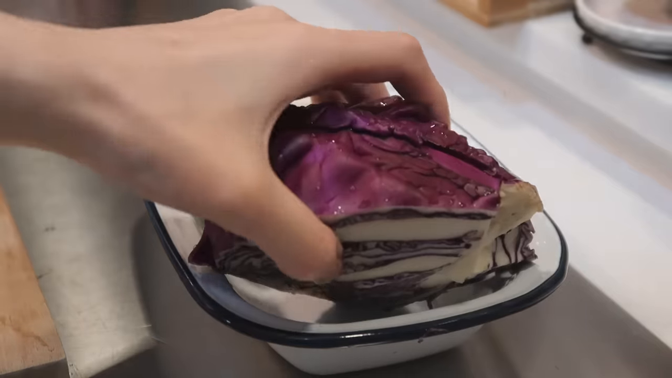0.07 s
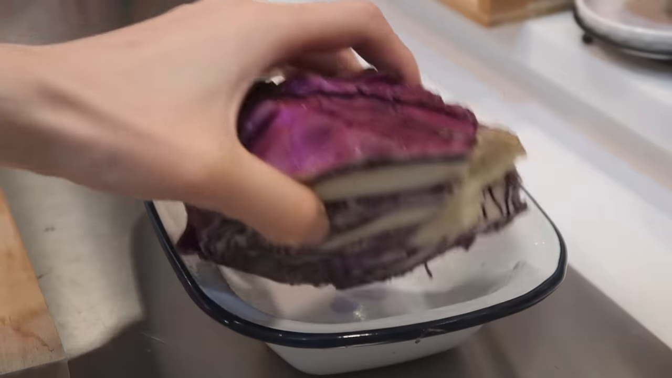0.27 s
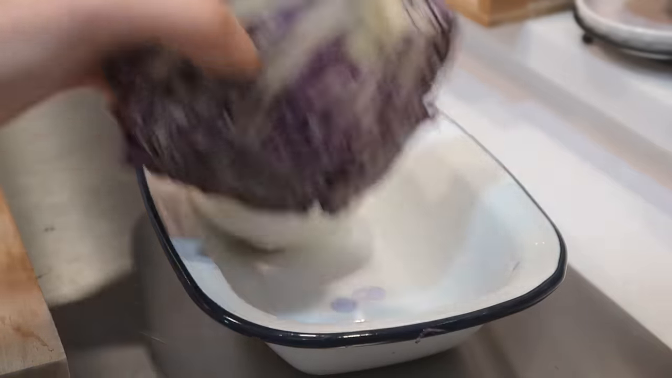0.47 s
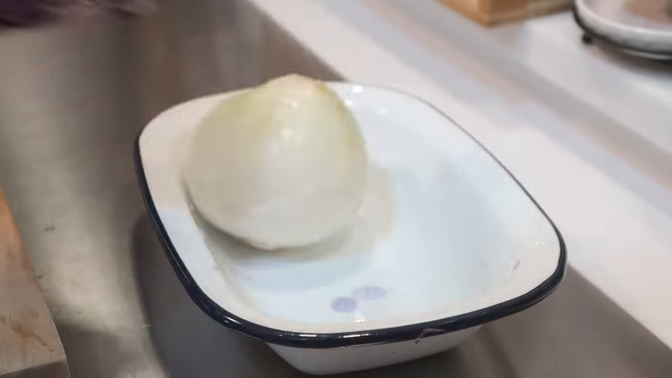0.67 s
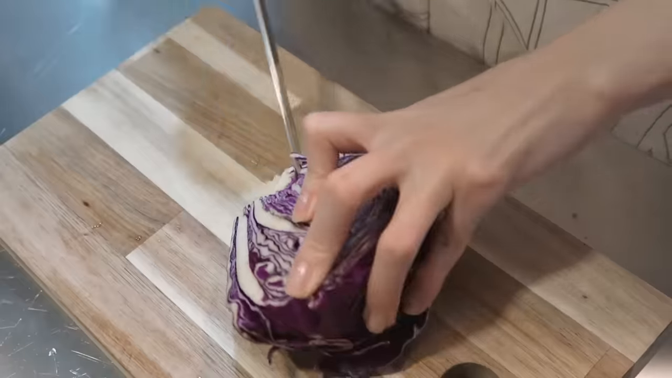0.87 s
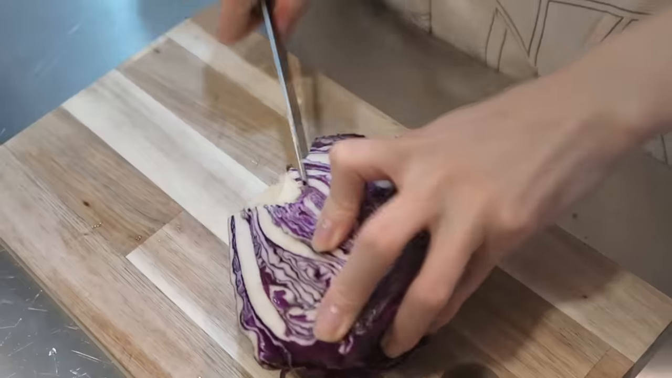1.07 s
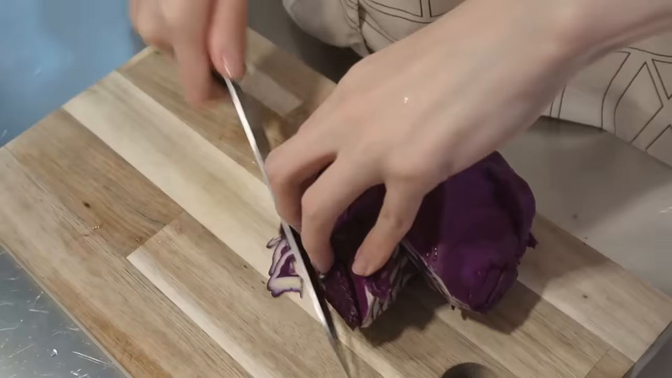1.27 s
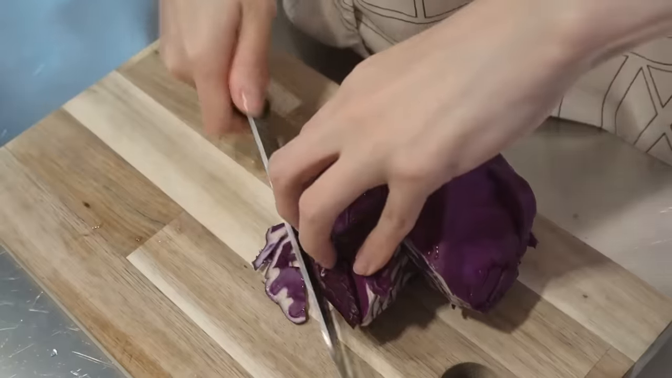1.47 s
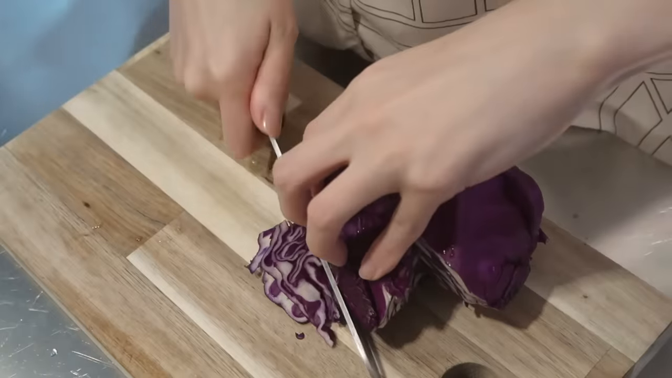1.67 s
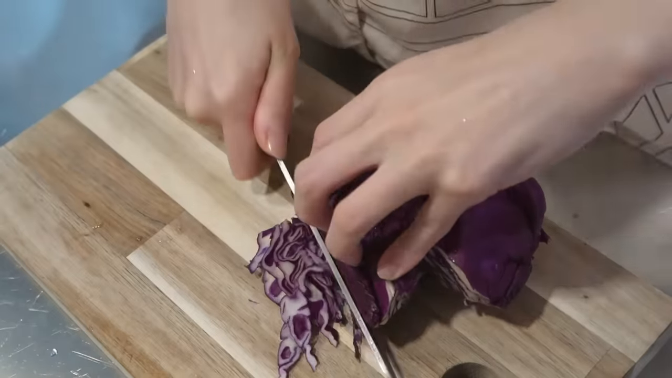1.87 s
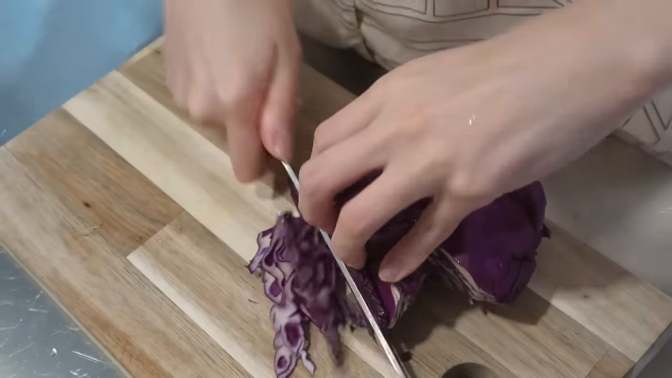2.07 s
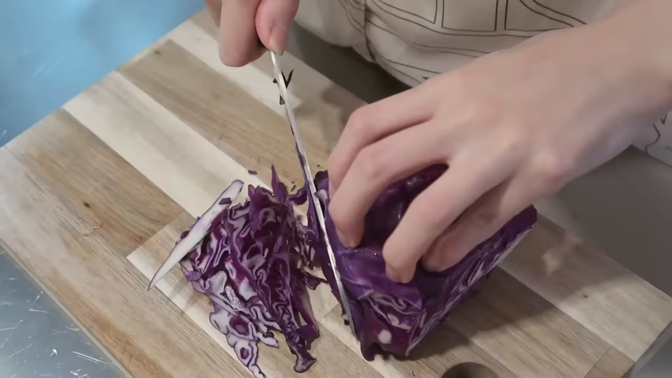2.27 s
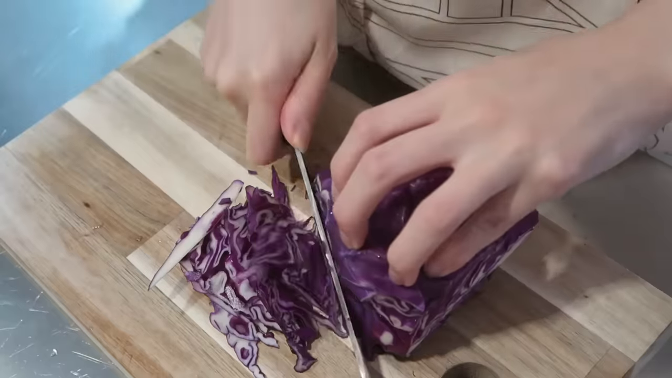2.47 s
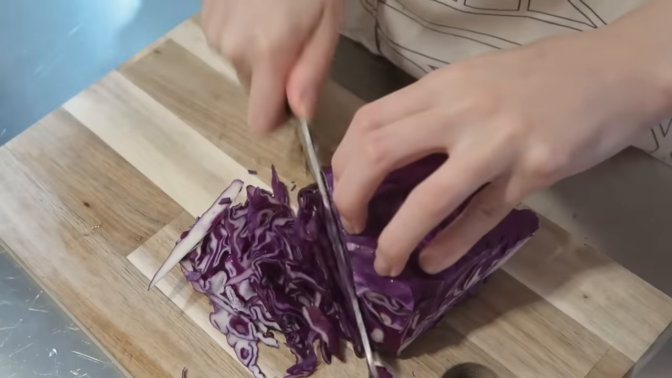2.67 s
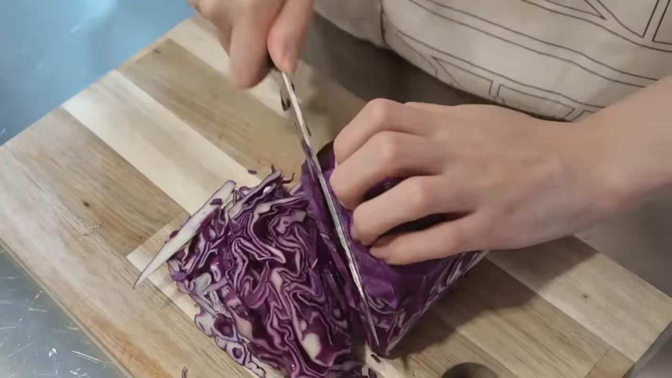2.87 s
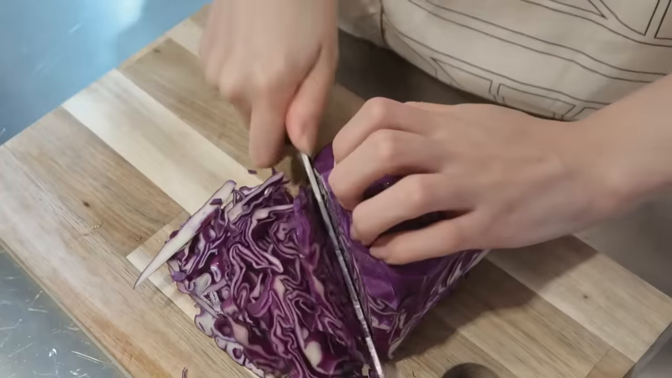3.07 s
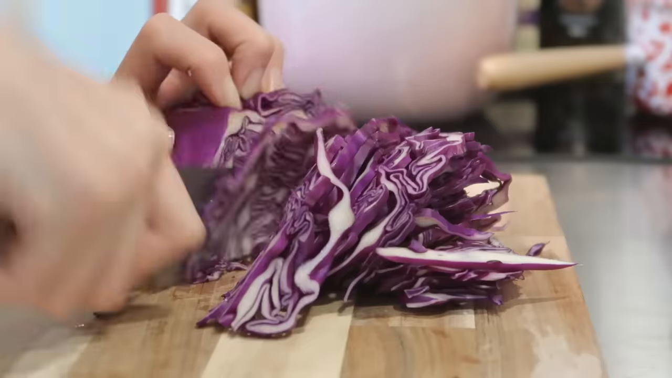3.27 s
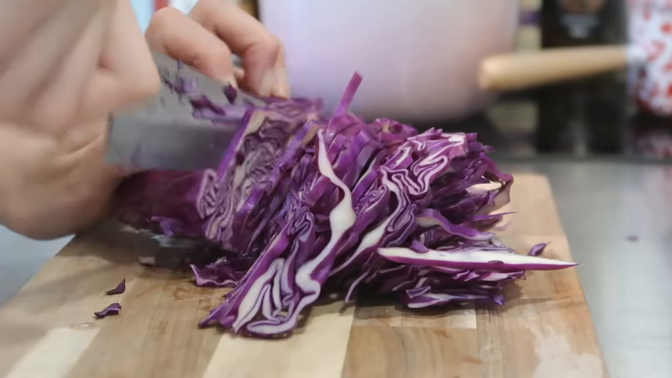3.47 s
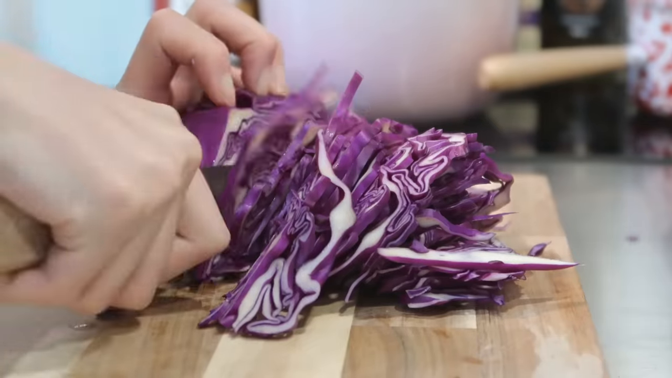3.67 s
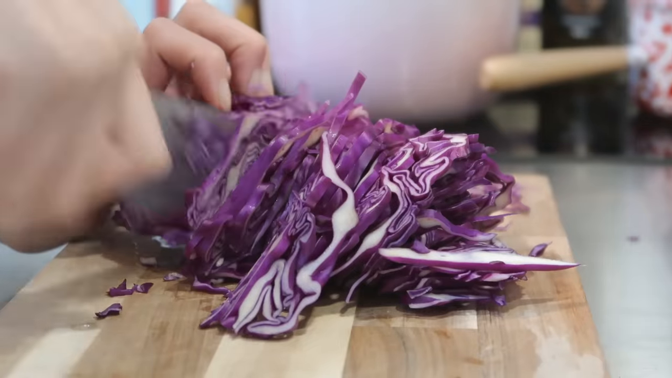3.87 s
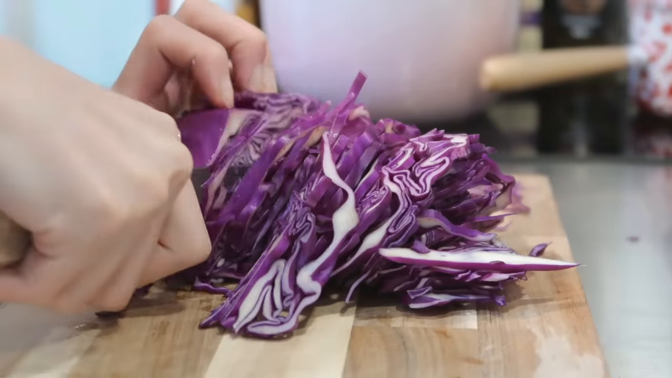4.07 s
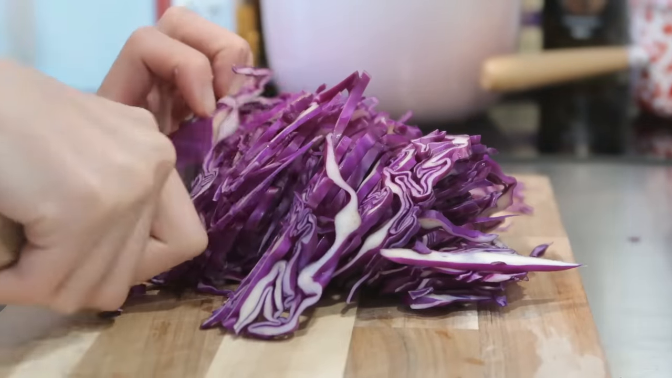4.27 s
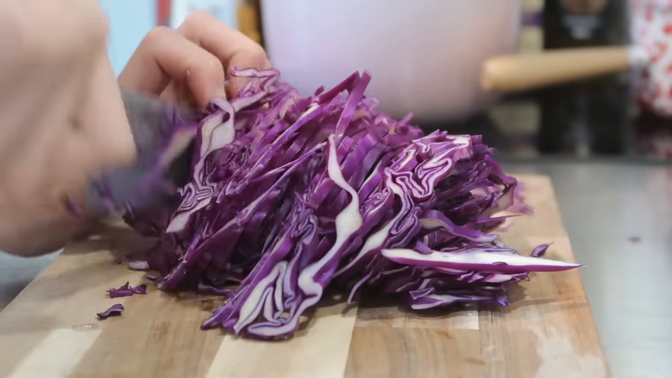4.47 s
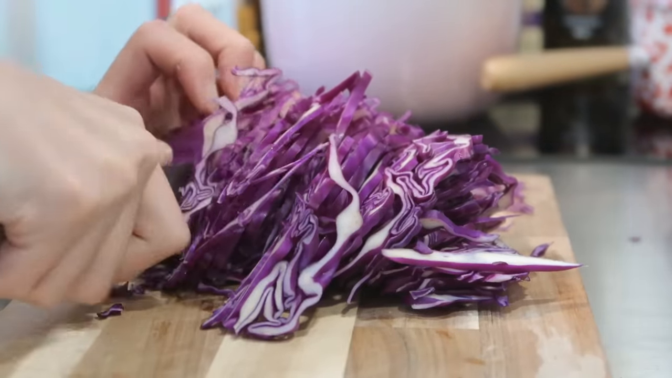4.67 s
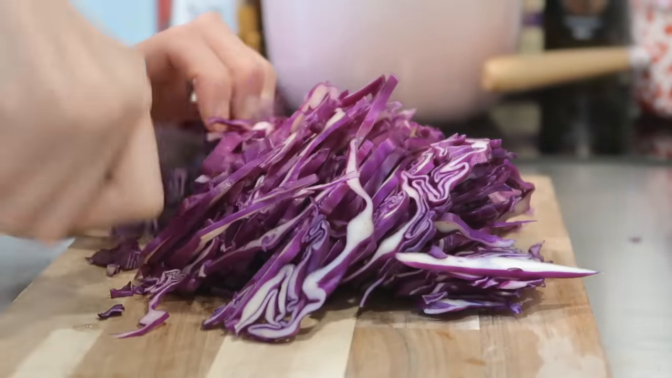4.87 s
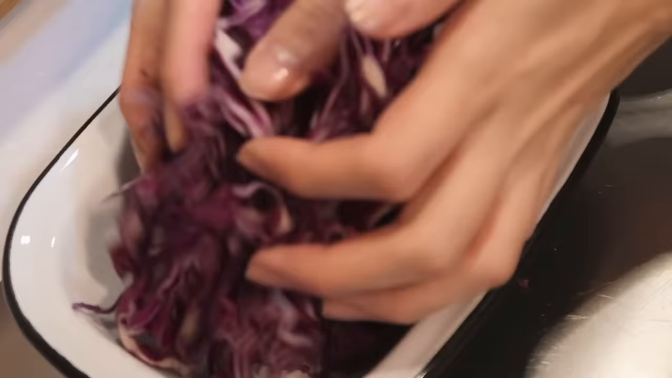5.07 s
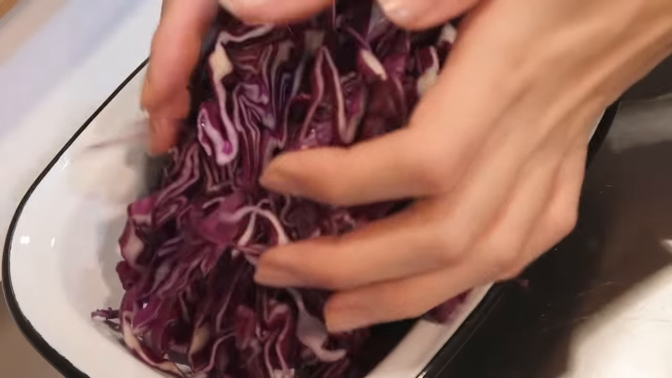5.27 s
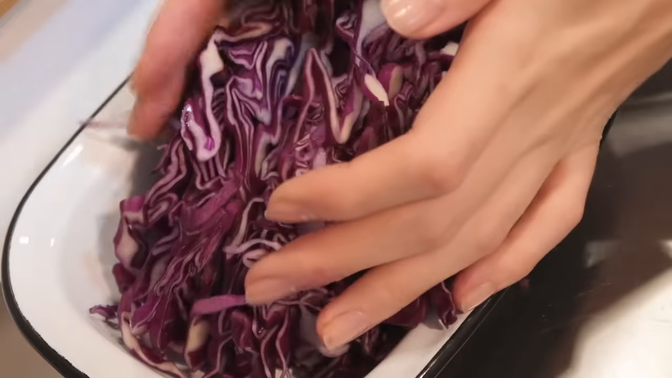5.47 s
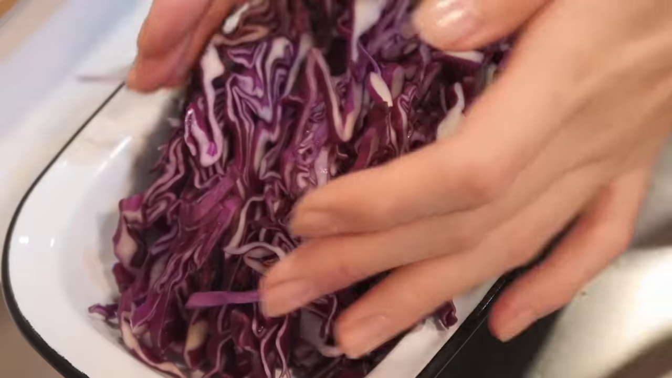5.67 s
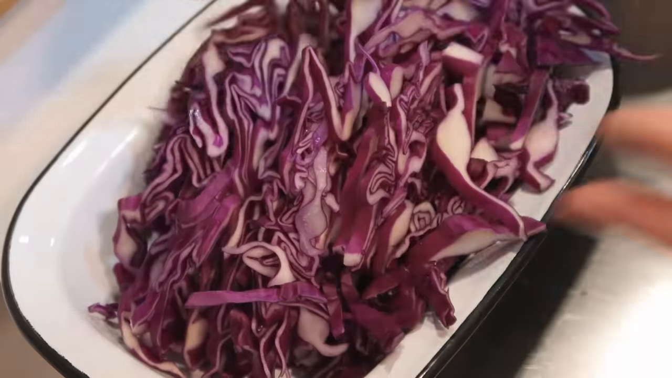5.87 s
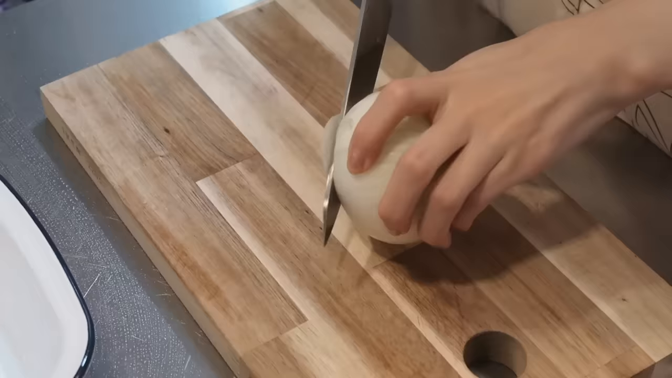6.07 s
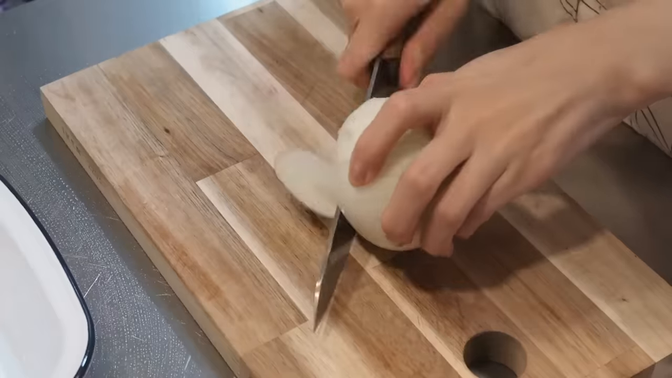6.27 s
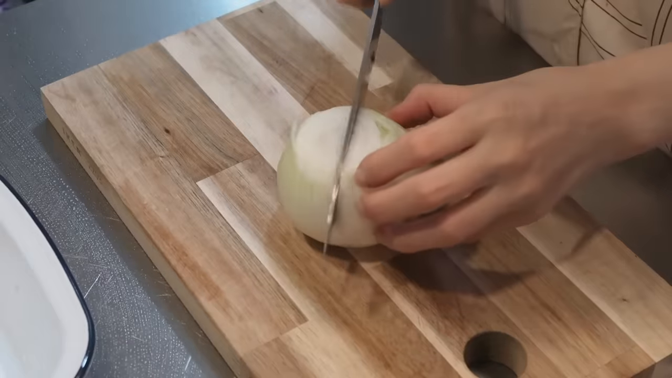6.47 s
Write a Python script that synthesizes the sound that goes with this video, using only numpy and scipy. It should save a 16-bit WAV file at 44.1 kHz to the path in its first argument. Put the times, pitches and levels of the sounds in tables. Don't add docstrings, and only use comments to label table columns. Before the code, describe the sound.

Close, dry recording in a small home kitchen. After nearly a second of steady low hum and a tiny tick, cabbage leaves rustle, ribs snap and a blade thuds loudly on wood. Regular shredding strokes follow, each a juicy rising crunch capped by a short woody crack. Around five seconds the chopping stops with small rustles; quiet hum remains until two crunchy cuts into a firm onion, abruptly ending.

```python
import sys
import numpy as np
from scipy import signal
from scipy.fft import rfft, irfft
from scipy.io import wavfile
from scipy.ndimage import uniform_filter1d

SR = 44100
rng = np.random.default_rng(int(sys.argv[2]) if len(sys.argv) > 2 else 0)


def wav_out(sig):
    wavfile.write(sys.argv[1], SR, np.round(np.clip(np.atleast_2d(sig).T, -1, 1) * 32767).astype(np.int16))


def gain_from_decibels(decibels):
    exponent = np.asarray(decibels, float) / 20
    return 10 ** exponent


N = 287866
T_S = np.arange(N) / SR
EDGE_FROM_S, ONION_FROM_S, SKIN_FROM_S, HEAD_UNTIL_S = 3.2, 6.0, 6.42, 1.092
FRAME_LEAD = 1024 - 123

# frequency in Hz, level in dB per Hz.
CRUNCH_SPECTRUM = [(180, -43), (300, -40.5), (994, -12.5), (1080, -8), (1580, -0.5), (2790, 0),
                   (3350, -4.5), (5700, -9), (10700, -15), (11900, -7), (15000, -26), (16000, -45)]
# frequency in Hz, level in dB per Hz.
ONION_SPECTRUM = [(410, -53), (700, -15.5), (1590, -11), (1750, -10.5), (2470, -10), (2690, -8),
                  (3110, -12), (3880, -3), (5390, -13), (7970, -20.5), (10200, -18.5), (12400, -12.5),
                  (13000, -33)]
# frequency in Hz, level in dB per Hz.
SKIN_SPECTRUM = [(400, -28), (709, -15), (1500, -4.5), (2740, -3), (4530, -0.5), (6500, -12), (9880, -19.5),
                 (13000, -20)]
# entry in seconds, exit in seconds, crunch on entry in dB,
# crunch at the end in dB, bright part in dB.
SLICES = [(1.023, 1.107, -56.5, -26.5, -15.5), (1.267, 1.365, -47.5, -36.5, -11.5),
          (1.642, 1.686, -54.5, -30, -4.5), (1.786, 1.87, -38.5, -32.5, -15),
          (2.026, 2.125, -42.5, -33, -15), (2.354, 2.467, -50.5, -34.5, -15.5),
          (2.62, 2.775, -50.5, -32.5, -13), (2.954, 3.053, -52.5, -28.5, -12),
          (3.229, 3.339, -59, -27.5, -9), (3.551, 3.65, -45.5, -31.5, -10),
          (3.905, 3.993, -46.5, -28, -12.5), (4.156, 4.266, -42, -31, -9), (4.523, 4.59, -68, -26, -8.5),
          (4.795, 4.941, -55, -37, -6), (6.197, 6.291, -42, -22, -3.5), (6.425, 6.529, -33, -36.5, -4)]
# extra brightness on entry in dB, extra dull part in dB, mid-depth swell in dB.
SLICE_TEXTURES = [(3, 1.5, -1.5), (-4, -0.5, 0), (1, 0.5, 1.5), (-2.5, 2.5, -4), (1.5, -2.5, -6),
                  (0, 12, 0.5), (0, 1.5, -2), (2, 9.5, -3), (3.5, 3, -1.5), (-1, 4.5, 3.5), (-2.5, -9, 2),
                  (0.5, -6, 2), (5.5, 0, -2), (-6, -2, 2), (5, 3, 2), (-4.5, 5, 0)]
SLICE_DULL_DB = (-9.5, -49, -29.5)
SLICE_EASE = (1.79, 2.13, 2.3)
# start in seconds, hold in seconds, crunch in dB,
# fall in dB per second, dull part in dB.
RUSTLES = [(0.809, 0.037, -44, 192, -2), (0.88, 0.021, -40.5, 507, 6), (1.095, 0.0083, -22, 1506, 4.5),
           (1.211, 0.0027, -56, 1207, 8), (1.545, 0.074, -41.5, 445, -21), (1.8, .01, -39, 295, -15),
           (2.306, 0.0049, -54, 552.5, -7.5), (2.603, .003, -62, 504, -8), (2.908, .005, -51.5, 223, 3),
           (3.179, 0.028, -52.5, 406.5, -17), (3.504, 0.0278, -55, 196.5, -13),
           (3.826, 0.039, -50, 451, -16), (4.035, .002, -48.5, 806, 26), (4.101, .01, -58, 500, 15.5),
           (4.145, .012, -51, 300, -7), (5.028, .045, -48.5, 350, -13), (4.289, 0.0021, -41.5, 382.5, 18),
           (4.422, 0.0092, -54, 69, -37), (4.941, 0.06, -38.5, 196, -11), (5.105, 0.035, -47.5, 329, 23.5),
           (5.164, 0.008, -43.5, 274, 4), (5.447, 0.014, -57.5, 600.5, 19), (6.107, .045, -49, 300, -2),
           (6.159, .003, -39, 703, -19), (6.297, 0.0054, -29.5, 396, 9.5), (6.322, 0.025, -29, 700, -16)]
RUSTLE_BRIGHT_DB = (-12.5, -9, -3)
# start in seconds, crunch in dB.
BRUSHES = [
    (0.935, -56.5),
    (1.003, -54.5),
    (1.026, -54.5),
    (1.488, -58),
    (3.752, -57.5),
    (4.742, -55.5),
    (5.136, -46.5),
    (4.827, -38.5),
    (6.203, -33),
]
# start in seconds, peak in dB, pitch in Hz.
RIB_SNAPS = [(0.2974, -26, 2510), (0.8127, -28, 2410), (0.8264, -20, 2130), (0.863, -30, 2360),
             (0.8975, -12.5, 2700), (0.934, -22.5, 3120), (1.0775, -15.5, 2370), (1.3059, -22, 2200),
             (1.6082, -38, 2030), (1.6435, -17, 2080), (2.5853, -40, 2120), (2.7514, -15, 2490),
             (4.828, -18, 2230), (4.9924, -17.5, 2240), (5.062, -42, 2000), (5.1736, -22.5, 1950),
             (6.1603, -30, 3910), (6.2018, -12.5, 4140), (6.2378, -13, 3800), (6.329, -11, 3840)]
# start in seconds, peak in dB, pitch in Hz, burst t60 in seconds.
LAYER_CRACKS = [(1.81, -21, 2100, 0.076), (1.079, -12, 2940, 0.019), (1.546, -33.5, 3000, .02),
                (2.075, -34.5, 2320, .05), (2.42, -26, 2090, .05), (2.7, -26, 2190, 0.074),
                (3.02, -43, 2290, 0.036), (3.2447, -33, 2960, 0.041), (3.263, -25, 2860, .02),
                (3.2985, -24, 2010, 0.021), (3.559, -33.5, 1850, 0.022), (3.566, -26, 2230, .02),
                (3.9122, -34, 3550, .02), (3.9286, -33, 2690, 0.023), (3.959, -41, 2700, .04),
                (4.162, -29, 2655, .02), (4.213, -20, 3770, 0.084), (4.5463, -40, 2540, 0.018),
                (4.8957, -21.5, 4780, 0.091), (4.915, -18, 5800, 0.061), (5.0615, -31.5, 6800, 0.025),
                (5.1335, -38, 3880, 0.028), (5.108, -33, 1900, 0.088), (5.15, -47, 3870, 0.051),
                (5.177, -39, 1720, .02), (2.44, -22, 3010, 0.0092), (2.75, -25, 5260, 0.014),
                (1.05, -26, 2400, .015), (6.2018, -10, 3960, 0.012), (6.2208, -13, 3850, .015),
                (6.23, -14, 3300, .012), (6.256, -17, 3400, 0.017), (6.316, -19, 3930, 0.025),
                (6.328, -14, 3740, 0.023), (6.346, -25, 3620, 0.0099), (6.49, -24.5, 2780, .015),
                (6.506, -19, 4100, 0.025), (6.518, -17, 2980, 0.023), (0.8806, -23.5, 2400, 0.024),
                (0.852, -31, 2440, 0.014), (1.0243, -34.5, 2460, 0.017), (1.0962, -10.5, 2300, 0.046),
                (3.233, -40, 2620, .02), (3.5901, -22.5, 1940, .04), (3.9418, -19, 2700, .03),
                (4.1838, -30, 1940, 0.035), (4.888, -27, 2790, 0.035), (3.318, -14, 1700, .04),
                (5.013, -42, 2100, .015), (6.341, -29, 3700, .008)]
# frequency in Hz, t60 in seconds, level in dB.
HEAD_RING = [(1180, 0.0089, -23), (2494, 0.0054, -25), (3330, 0.006, -27.5)]
# frequency in Hz, t60 in seconds, level in dB.
ONION_RING = [(2930, 0.0071, -37.5), (3870, 0.0019, -17.5)]
CHOPS = [(1.102, -21.5, 12, 6, -16), (1.366, -20, 3, 9, 0.5), (1.685, -15.5, 4.5, 6, 3.5),
         (1.8518, -18.5, 0, 4, 4), (2.113, -23, 5, 5, 1.5), (2.46, -21, 4.5, 5, -14),
         (2.77, -20, 8.5, 6, -2), (3.0584, -20.5, 11.5, -5, 3), (3.341, -29, 9.5, 12, -28),
         (3.641, -27.5, 9, 13.5, 1.5), (3.992, -30.5, 8, 2.5, -14.5), (4.2551, -29, 10, -1.5, 6),
         (4.585, -25, 8, 2.5, -6.5), (4.9239, -34, -7, -42, -4), (5.0804, -31.5, -3, -29, -33),
         (5.105, -34, 0, -18, -32), (6.2643, -27, 4, 7, -7)]
CHOP_COLOUR_HZ = [600, 1150, 2500, 6000]
# bounce delay in seconds, bounce in dB, ring length as a share,
# low wood in dB, wood between knock and ring in dB.
LANDINGS = [(.0045, -2, 0.91, 9, -9.5), (.0045, -8, 0.76, 7, 2), (.0045, -12.5, 0.71, 3, 3.5),
            (.0045, -7.5, 0.85, -8.5, -0.5), (.0045, -13.5, 0.97, -8, -4), (.0045, -15.5, 0.85, -14, -2.5),
            (.0045, -9, .85, -10.5, 5), (.0045, -9, 1, 1.5, 10), (.0065, -6, 1, 6, 3),
            (.0065, -5, 0.77, 13.5, 4), (.0065, 0.5, 1, 0, 4), (.007, -2.5, .7, 0, -7),
            (.0065, -6.5, 1, 4, -2.5), (.0065, 5.5, 0.93, -7, -3), (.0085, -3.5, 0.52, 21, 19),
            (.009, -13, 0.55, -19, 22), (.0066, -3, 0.96, -1.5, 3)]
WOOD_HZ = [330, 480, 1300, 1700, 2200]
# pitch as a share, worktop thump in dB, thin wood in dB, steel glint in dB.
HOLDS = [(1.001, 15, -1, -5), (1.001, -1, 1, -4.5), (1.001, -7.5, -2.5, -5), (1.001, -3, 1.5, -6),
         (1.001, 1, 5.5, -6.5), (1.001, -1, 5.5, 6), (1.001, -3, -4, 3), (1.001, 2.5, -1.5, -5),
         (1.001, -12, -2, -2.5), (1.001, 2.5, -3, 1), (1.001, -1, 0.5, -5), (1.001, 0, -1.5, 3),
         (1.001, -16, -8, -6), (1.001, -5, 2, -7), (1.001, 6, -2, -2.5), (1.001, 19.5, 7, -2.5),
         (1.001, 7, 0.5, -4.5)]
THIN_WOOD_HZ = [600, 760, 950, 5600, 7400]
# frequency in Hz, level in dB re thud, t60 in seconds.
BOARD_SPOTS = [(1210, 13.5, .045), (990, 8.5, 0.044), (770, 7, 0.027), (927, 6, 0.038), (1020, 15, 0.028),
               (997, 8, 0.047), (1328, 13.5, 0.028), (1290, 13.5, 0.048), (967, 6.5, 0.023),
               (572, 5.5, .04), (790, 1, 0.034), (566, 3.5, 0.053), (1020, 10, 0.038), (580, -1, 0.039),
               (630, 4, .03), (644, 7.5, 0.055), (445, 13, 0.083)]
# frequency in Hz, level in dB, t60 in seconds.
BOARD_ABOVE = [(285, -14.5, 0.047), (433, -4, 0.013), (566, -3.5, 0.043), (750, -6.5, 0.034),
               (962, -5.5, 0.032), (1102, 0, 0.017), (1280, -4.5, 0.02), (1518, -3.5, 0.0085),
               (1700, -3.5, 0.011), (2090, -4.5, 0.0074), (2388, 2, 0.017), (2514, 5, 0.013),
               (2655, 3, 0.008), (3190, -9, 0.034), (4536, -4, 0.0082), (5350, -6.5, 0.0082),
               (7200, -6.5, 0.0025), (9700, 0.5, 0.0043)]
# frequency in Hz, level in dB, t60 in seconds.
BOARD_EDGE = [(337, -39.5, 0.093), (424, -8, 0.098), (540, 1.5, 0.037), (644.4, -2.5, 0.031),
              (749, -12.5, 0.029), (968, -5, 0.026), (1276, -4.5, 0.018), (1750, -14, 0.031),
              (2030, -15, 0.014), (2330, -9.5, 0.04), (2608, -4.5, 0.032), (3110, -16, 0.0078),
              (4440, -9.5, 0.013), (6640, -10.5, 0.0079), (9560, -16.5, 0.0042)]
# frequency in Hz, level in dB, t60 in seconds.
BOARD_ONION = [(122, -11.5, 0.047), (278, -9, 0.12), (330, -17.5, 0.043), (437, -1.5, 0.12),
               (505, -18.5, 0.048), (962, -1.5, 0.062), (1230, 5.5, 0.011), (1700, -12, 0.072),
               (2360, 9, 0.026), (2560, -12.5, 0.026), (3610, 0.5, 0.0065), (5100, -2.5, 0.0099)]
LOW_LATE_DB = (3.5, 4.5, -1)
# top frequency by view, in Hz.
CONTACT_HZ = (15000, 8020, 7610)
# frequency in Hz, level in dB re thud, t60 in seconds.
WORKTOP = [(48, -26.5, 0.2), (101, -18, 0.05), (238, -18.5, 0.01), (319.5, -14.5, 0.083)]
# cut in seconds, room noise in dB, fridge hum in dB, background change after a chop in dB.
SCENES = [(0, -48.5, -42, 0), (.8, -51.5, -56.5, -5), (1.262, -52.5, -59, -7), (1.543, -53.5, -47.5, -20),
          (1.786, -54.5, -55, -8), (2.025, -58, -76, -6), (2.306, -54, -51.5, -9.5),
          (2.587, -53, -48, -10.5), (2.905, -52, -53.5, -8), (3.188, -54, -44.5, -5.5),
          (3.505, -52.5, -48, -5), (3.827, -55.5, -45, -2.5), (4.146, -51, -43.5, -3.5),
          (4.427, -56.5, -52.5, 2), (4.8, -51, -43.5, -3), (5.103, -51, -53, 3), (6.102, -50.5, -67.5, 3.5),
          (6.427, -50, -74, -4)]
# frequency in Hz, width in Hz, level in dB.
FRIDGE_LINES = [(118.4, 0, 0), (119, 14, -13), (59.5, 5, -11), (177.6, 5, -15), (581.4, 12, -10),
                (345, 14, -19), (205, 20, -17), (948, 6, -26), (13001, 0, -47)]
# frequency in Hz, width in Hz, level in dB.
FAN_LINES = [(51, 11, -2), (79.7, 3, -13), (94.15, 5, -4), (162, 13, -8), (225, 45, -14.5),
             (225, 33, -11.5)]
# frequency in Hz, level in dB per Hz.
ROOM_NOISE = [(12, -43), (20, -6.5), (70, -9), (119, -9), (166, -16.5), (252, -13.5), (439, -17.5),
              (581, -14.5), (667, -20), (1200, -21.5), (1920, -27.5), (13100, -48), (15500, -80)]
# frequency in Hz, left-right likeness from -1 to 1.
ROOM_LIKENESS = [(60, 1), (180, 0.58), (550, 0.71), (1650, -0.016), (4970, 0.2), (15000, -0.64)]
# frequency in Hz, t60 in seconds, echo in dB.
KITCHEN_ECHO = [(150, 0.13, -14.5), (427, 0.26, -11.5), (1030, 0.24, -27.5), (1700, 0.18, -22),
                (2700, 0.14, -22), (3940, 0.12, -20.5), (7000, 0.088, -16.5), (14000, 0.12, -31.5)]
# frequency in Hz, phase between the ports in radians.
PORT_PHASE = [(0, -0.5), (1200, 1.3), (3000, 0.83), (5000, 2.5), (8000, 8), (14000, 9), (16000, 6)]


def stroke_controls():
    last_bite_db, last_bite_s = 1.5, 0.0079
    board_dull_db, slice_fade_db_per_s = -1.5, 898.5
    rustle_rise_db_per_s = 6009
    out = np.zeros((3, N)) - [[120], [0], [0]]
    for (start, end, enter_db, end_db, bright_db), (airy_db, thick_db, swell_db) in zip(SLICES, SLICE_TEXTURES):
        view = view_at(start)
        left = np.clip((end - T_S) / (end - start), 0, 1)
        near = np.exp(-np.maximum(end - T_S, 0) / last_bite_s)
        level_db = end_db + (enter_db - end_db) * left ** SLICE_EASE[view]
        level_db += swell_db * np.sin(np.pi * left) + last_bite_db * near
        level_db -= slice_fade_db_per_s * np.maximum(T_S - end, 0)
        dull_db = SLICE_DULL_DB[view] + thick_db + board_dull_db * near
        leads = (T_S >= start) & (level_db > out[0])
        out = np.where(leads, [level_db, dull_db, bright_db + airy_db * (2 * left - 1)], out)

    brushes = [(s, 0.0052, db, 898, -10.5) for s, db in BRUSHES]
    for start, hold_s, peak_db, fall_db_per_s, dull_db in list(RUSTLES) + brushes:
        level_db = peak_db - rustle_rise_db_per_s * np.maximum(start - T_S, 0)
        level_db -= fall_db_per_s * np.maximum(T_S - start - hold_s, 0)
        bright_db = RUSTLE_BRIGHT_DB[view_at(start)]
        out = np.where(level_db > out[0], [level_db, dull_db + 0 * T_S, bright_db + 0 * T_S], out)
    return out


def crunch(level_db, dull_db, bright_db):
    bursts_per_s, uneven_db, ring_cycles = 22000, 3.0, 12.0
    patch_samples, patchy_db = 800, 1.0
    clicks = gain_from_decibels(uneven_db * np.minimum(rng.exponential(1, N), 5)) * rng.choice([-1, 1], N)
    clicks *= rng.random(N) < bursts_per_s / SR
    pitches_hz = np.geomspace(350, 14500, 28)
    dealt = rng.integers(0, 28, N)
    patches = uniform_filter1d(rng.standard_normal((28, N // patch_samples + 2)), size=2, axis=0)
    out = 0
    for k, hz in enumerate(pitches_hz):
        dull, bright = np.clip(np.log2([1500 / hz, hz / 4000]), 0, 1)
        fine = (hz > 4500) & (dealt % 7 == k % 7)
        gain_db = np.select([T_S > SKIN_FROM_S, T_S > ONION_FROM_S],
                            [at_hz(SKIN_SPECTRUM, hz), at_hz(ONION_SPECTRUM, hz)],
                            at_hz(CRUNCH_SPECTRUM, hz))
        gain_db = gain_db + dull * (dull_db + 15.5) + bright * (bright_db + 8.5) - 9.0
        gain_db += patchy_db * np.interp(np.arange(N) / patch_samples, np.arange(patches.shape[1]), patches[k])
        cells = rms_one(ring(clicks * ((dealt == k) | fine), hz, ring_cycles / hz))
        out = out + np.sqrt(hz / 2500) * cells * gain_from_decibels(gain_db)
    return gain_from_decibels(level_db) * np.where(T_S < EDGE_FROM_S, dull_top(out, 15800), dull_top(out, 15700))


def snaps():
    ring_s, tear_t60_s = 0.0021, 0.059
    out, t = np.zeros(N), np.arange(SR // 10) / SR
    for s, peak_db, hz in RIB_SNAPS:
        tear = rng.standard_normal(len(t)) * gain_from_decibels(-60 * t / tear_t60_s)
        tear[0] = 6.8
        body = ring(tear, hz, ring_s)
        body += 0.49 * ring(tear, 1.5 * hz, 0.77 * ring_s)
        body -= 0.5 * ring(tear, 0.73 * hz, ring_s)
        out[round(s * SR):][:len(t)] += gain_from_decibels(peak_db - 5.5) * body / np.abs(body).max()
    return second_order(out, 6000)


def cracks():
    ring_s = 0.0019
    out, t = np.zeros(N + SR), np.arange(SR // 10) / SR
    for s, peak_db, hz, t60 in LAYER_CRACKS:
        tear = rng.standard_normal(len(t)) * gain_from_decibels(-60 * t / t60)
        body = ring(tear, hz, ring_s) - 0.74 * ring(tear, 0.72 * hz, ring_s)
        out[round(s * SR):][:len(t)] += gain_from_decibels(peak_db - 4.0) * body / np.abs(body).max()
    return second_order(out[:N], 7000)


def bodies(leaves):
    head = leaves + sum(gain_from_decibels(level_db) * ring(leaves, hz, t60) for hz, t60, level_db in HEAD_RING)
    head = signal.sosfilt(signal.butter(4, 1090, "high", fs=SR, output="sos"), head)
    bulb = sum(gain_from_decibels(level_db) * ring(leaves, hz, t60) for hz, t60, level_db in ONION_RING)
    skin_db = -6 * (T_S > SKIN_FROM_S)
    onion = gain_from_decibels(-3.0) * second_order(leaves, 11660) + gain_from_decibels(skin_db) * bulb
    return np.select([T_S < HEAD_UNTIL_S, T_S > ONION_FROM_S], [head, onion], leaves)


def chops():
    rattle_db, rattle_s, bite_db, bite_s = -22, 0.011, (-8, -3, -4), 0.0024
    contact_s, arrive_s, most_cycles = 0.0002, 0.0013, 50
    out, t = np.zeros(N + SR), np.arange(SR // 4) / SR
    for chop, landing, hold, spot in zip(CHOPS, LANDINGS, HOLDS, BOARD_SPOTS):
        s, peak_db, *colour_db = chop
        bounce_s, bounce_db, share, low_db, between_db = landing
        load, _, thin_db, glint_db = hold
        spot_hz, spot_db, spot_t60 = spot
        view = view_at(s)
        modes = (BOARD_ABOVE, BOARD_EDGE, BOARD_ONION)[view]
        rattle = rng.standard_normal(len(t)) * gain_from_decibels(rattle_db) * np.exp(-t / rattle_s)
        luck = rng.standard_normal((len(modes), 4))
        knock = 0
        for k, ((hz, level_db, t60), (strong, late, again, grip)) in enumerate(zip(modes, luck)):
            held_hz = load * hz * (1 + grip / 80)
            force = rattle / (1 + (hz / 3300) ** 4)
            late_db = LOW_LATE_DB[view] * (hz < 650)
            force[int(abs(late) * contact_s * SR)] += gain_from_decibels(-late_db)
            force[int((bounce_s + again * contact_s) * SR)] += gain_from_decibels(bounce_db + late_db)
            gain_db = level_db + strong + peak_db + 12.0
            gain_db += np.interp(np.log(hz), np.log(CHOP_COLOUR_HZ), [0, *colour_db])
            gain_db += np.interp(np.log(hz), np.log(WOOD_HZ), [low_db, 0, 0, between_db, 0])
            gain_db += np.interp(np.log(hz), np.log(THIN_WOOD_HZ), [0, thin_db, 0, 0, glint_db])
            knock = knock + (-1) ** k * gain_from_decibels(gain_db) * ring(force, held_hz, share * min(t60, most_cycles / hz))
        nearest = np.argmin(np.abs(np.array(modes)[:, 0] - spot_hz))
        knock = knock + (-1) ** nearest * gain_from_decibels(peak_db + spot_db) * ring(force, spot_hz, spot_t60)
        bite = gain_from_decibels(bite_db[view] * np.clip(2 * t / bite_s - 2, 0, 1))
        out[round((s + arrive_s) * SR):][:len(t)] += second_order(bite * knock, CONTACT_HZ[view])
    return out[:N]


def counter_thump():
    s, thud_db = np.array(CHOPS)[:, :2].T
    thump_db = np.array(HOLDS)[:, 1]
    luck_db = 1.5 * rng.standard_normal((len(s), len(WORKTOP)))
    out = 0
    for k, (hz, level_db, t60) in enumerate(WORKTOP):
        push = np.zeros(N)
        push[(s * SR).astype(int) + 60] = gain_from_decibels(thud_db + thump_db + level_db + luck_db[:, k])
        out = out + ring(push, hz, t60)
    return second_order(out, 400)


def background():
    duck_s, hum_waver_s, hum_waver_db = 0.055, 0.059, 7
    rows = np.array(SCENES)
    cut, noise_db, hum_db, duck_db = rows[np.searchsorted(rows[:, 0], T_S, "right") - 1].T
    hits = np.array([-1] + [row[0] for row in CHOPS])
    last = hits[np.searchsorted(hits, T_S, "right") - 1]
    duck = gain_from_decibels(duck_db * (last > cut) * -np.expm1((last - T_S) / duck_s))
    noise = 0
    for hz, mid, side in bands(N):
        noise = noise + gain_from_decibels(at_hz(ROOM_NOISE, hz)) * spread(mid, side, at_hz(ROOM_LIKENESS, hz))
    noise = gain_from_decibels(noise_db) * rms_one(dull_top(noise, 21000))
    waver_db = hum_waver_db * wander(hum_waver_s) * (T_S > rows[1, 0])
    hum = gain_from_decibels(hum_db - 4.0 + waver_db) * drone(FRIDGE_LINES)
    fan_db = np.where(T_S < 4.799, -61.5, -50.5)
    return duck * (noise + hum + gain_from_decibels(fan_db) * drone(FAN_LINES))


def drone(lines):
    out = 0
    for hz, width_hz, level_db in lines:
        line = np.sin(2 * np.pi * hz * T_S)
        if width_hz:
            once = ring(rng.standard_normal(N + SR), hz, 2.2 / width_hz)
            line = ring(once, hz, 2.2 / width_hz)[SR:]
        out = out + gain_from_decibels(level_db) * rms_one(line)
    return out


def kitchen(x, alike_hz=2500):
    first_echo_s, size = 0.0043, SR // 2
    t, echo = np.arange(size) / SR, 0
    for hz, mid, side in bands(size):
        t60 = at_hz(KITCHEN_ECHO, hz)
        dying = gain_from_decibels(at_hz(KITCHEN_ECHO, hz, column=2) - 60 * t / t60) / np.sqrt(t60 * SR / 14)
        echo = echo + spread(mid, side, 1 / (1 + (hz / alike_hz) ** 2)) * dying * (t > first_echo_s)
    return signal.fftconvolve(x[None], echo, axes=1)[:, :N]


def near_pair(x, other, turn_above=0.2, turn_edge=-0.18):
    from_above = T_S < EDGE_FROM_S
    high = signal.sosfilt(signal.butter(2, 3800, "high", fs=SR, output="sos"), other)
    own = gain_from_decibels(np.where(from_above, -2.5, -5)) * high
    hz, lead_rad = np.transpose(PORT_PHASE)
    half = 0.5j * np.interp(np.arange(N // 2 + 1) * SR / N, hz, lead_rad) * [[1], [-1]]
    above = irfft(rfft(x) * np.exp(turn_above * half), N)
    edge = irfft(rfft(x) * np.exp(turn_edge * half), N)
    return np.where(from_above, above, edge) + own * [[1], [-1]]


def masked_treble(pair):
    under_db, chance_db, onion_db, edge_db, loud_db, band_hz = -23, 9.0, 7, 5.0, -61.5, 690
    mid, side = (pair[0] + pair[1]) / 2, (pair[0] - pair[1]) / 2
    hz, s, frames = framed(mid)
    power = uniform_filter1d(np.abs(frames) ** 2, size=3, axis=1) + 1e-20
    masker = power[(hz > 1800) & (hz < 4500)].mean(axis=0)
    limit_db = under_db + np.select([s > ONION_FROM_S, s > EDGE_FROM_S], [onion_db, edge_db])
    for low in np.arange(8200, 16000, band_hz):
        band = (hz >= low) & (hz < low + band_hz)
        luck_db = chance_db * uniform_filter1d(rng.standard_normal(len(masker)), size=3)
        frames[band] *= 10 * np.log10(power[band].mean(axis=0) / masker) + luck_db > limit_db
    frames[hz > 13700] *= (s < EDGE_FROM_S) | (10 * np.log10(masker) < loud_db)
    mid = unframed(frames)
    return np.array([mid + side, mid - side])


def masked_side(pair):
    under_db, chance_db, loud_db, knock_db = -8.0, 13.0, -70, -38
    mid, side = (pair[0] + pair[1]) / 2, (pair[0] - pair[1]) / 2
    hz, s, centre = framed(mid)
    frames = framed(side)[2]
    edges_hz = np.geomspace(900, 3500, 9)
    for low, high in zip(edges_hz, edges_hz[1:]):
        band = (hz >= low) & (hz < high)
        mid_db = 10 * np.log10(np.mean(np.abs(centre[band]) ** 2, axis=0) + 1e-20)
        side_db = 10 * np.log10(np.mean(np.abs(frames[band]) ** 2, axis=0) + 1e-20)
        luck_db = chance_db * uniform_filter1d(rng.standard_normal(len(s)), size=3)
        frames[band] *= (side_db - mid_db + luck_db > under_db) | (mid_db < loud_db) | (mid_db > knock_db)
    side = unframed(frames)
    return np.array([mid + side, mid - side])


def framed(x):
    return signal.stft(np.r_[np.zeros(FRAME_LEAD), x], SR, "cosine", 2048)


def unframed(frames):
    return signal.istft(frames, SR, "cosine", 2048)[1][FRAME_LEAD:FRAME_LEAD + N]


def view_at(s):
    return int(s > EDGE_FROM_S) + int(s > ONION_FROM_S)


def rms_one(x):
    return x / np.sqrt(np.mean(x ** 2) + 1e-20)


def at_hz(points, hz, column=1):
    points = np.array(points)
    return np.interp(np.log(hz), np.log(points[:, 0]), points[:, column])


def ring(clicks, hz, t60):
    r, w = gain_from_decibels(-60 / (t60 * SR)), 2 * np.pi * hz / SR
    return signal.lfilter([0, np.sin(w)], [1, -2 * r * np.cos(w), r * r], clicks + 1e-18)


def bands(size):
    white = rng.standard_normal((2, 2, size))
    for k, low in enumerate(20 * 2 ** np.arange(0, 10, 0.5)):
        sos = signal.butter(2, [low, low * 2 ** 0.5], "band", fs=SR, output="sos")
        mid, side = signal.sosfilt(sos, white[k % 2])
        yield low * 2 ** 0.25, mid, side


def spread(mid, side, alike):
    alike = np.clip(alike, -1, 1)
    return np.sqrt(1 + alike) * mid + np.sqrt(1 - alike) * side * [[1], [-1]]


def wander(step_s):
    return np.interp(np.arange(N) / (step_s * SR), np.arange(4000), rng.standard_normal(4000))


def second_order(x, cut_hz):
    return signal.sosfilt(signal.butter(2, cut_hz, fs=SR, output="sos"), x)


def dull_top(x, cut_hz):
    return signal.sosfilt(signal.butter(8, cut_hz, fs=SR, output="sos"), x)


def scene():
    controls = stroke_controls()
    cells, ribs, knocks = crunch(*controls), snaps(), chops()
    clumps = gain_from_decibels(2.2 * wander(0.009))
    leaves = bodies(clumps * cells + ribs)
    other_leaves = bodies(clumps * crunch(*controls))
    cutting = masked_treble(near_pair(leaves, other_leaves) + kitchen(gain_from_decibels(12.0) * leaves))
    board = near_pair(knocks, 0 * knocks, turn_above=0.22, turn_edge=-0.15) + kitchen(knocks, alike_hz=2800)
    rest = background() + counter_thump()
    splits = cracks()
    splits = near_pair(splits, 0 * splits) + kitchen(gain_from_decibels(14.0) * splits)
    return cutting + board + rest + splits


def top_cut(x):
    return signal.sosfilt(signal.butter(12, 16660, fs=SR, output="sos"), x)


def record(dry):
    ceiling = np.where(T_S < ONION_FROM_S, 0.57, 0.9)
    clipped = dry / (1 + np.abs(dry / ceiling) ** 8) ** (1 / 8)
    clipped = dull_top(dull_top(clipped, 16900), 16900)
    mix = masked_side(clipped)
    return top_cut(mix)


dry = scene()
out = record(dry)
wav_out(out)
```